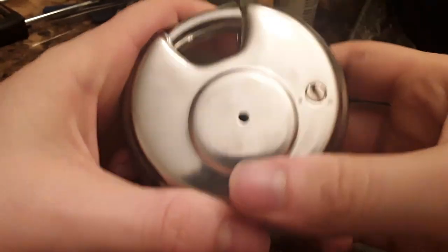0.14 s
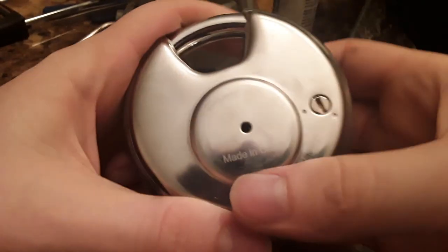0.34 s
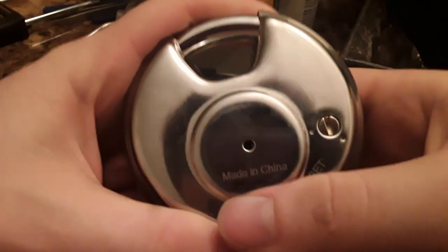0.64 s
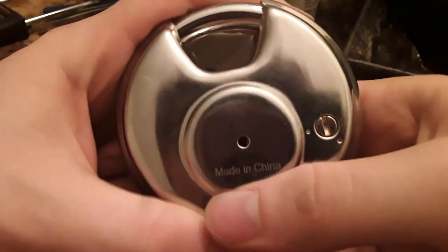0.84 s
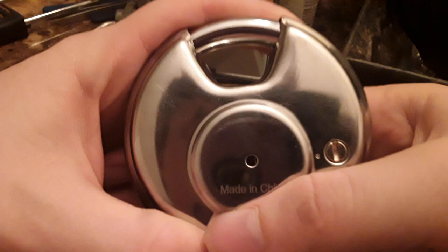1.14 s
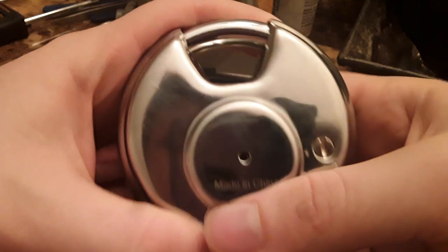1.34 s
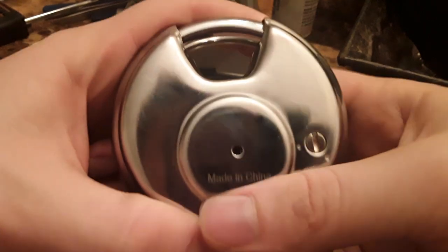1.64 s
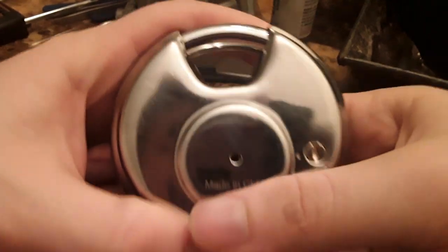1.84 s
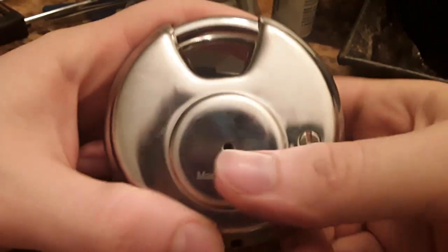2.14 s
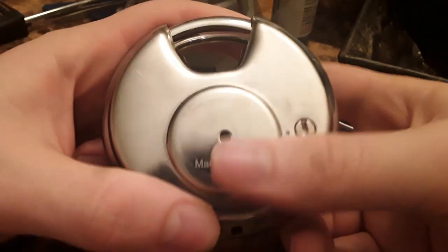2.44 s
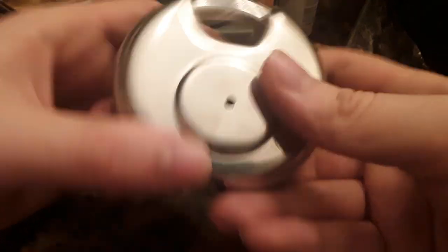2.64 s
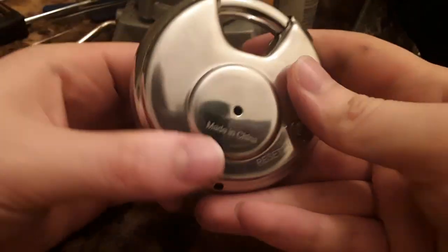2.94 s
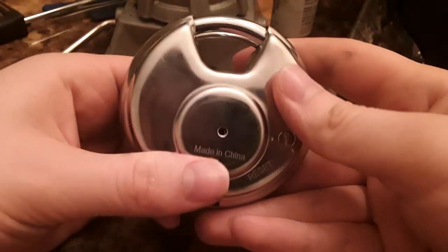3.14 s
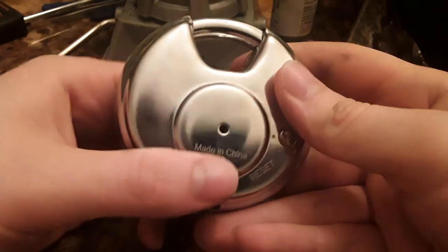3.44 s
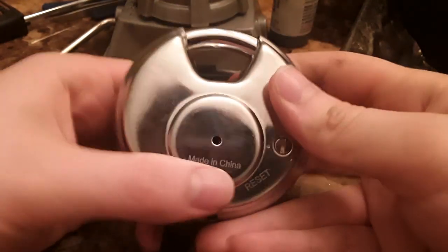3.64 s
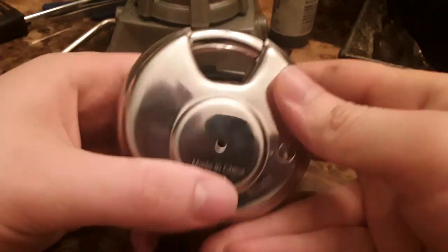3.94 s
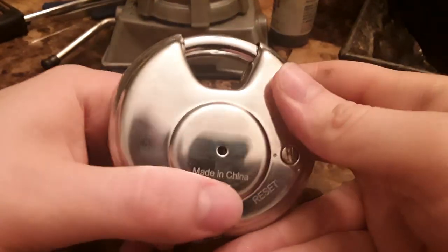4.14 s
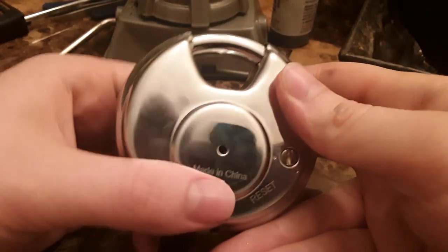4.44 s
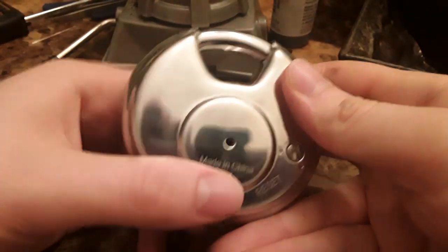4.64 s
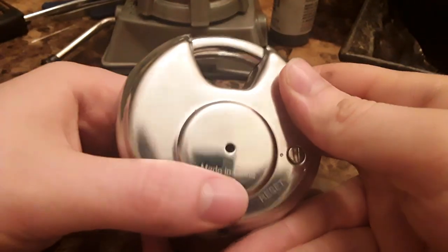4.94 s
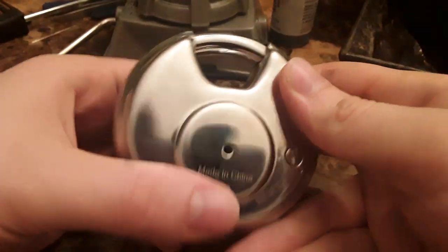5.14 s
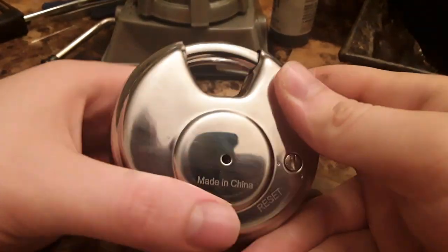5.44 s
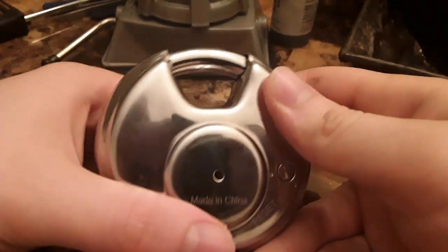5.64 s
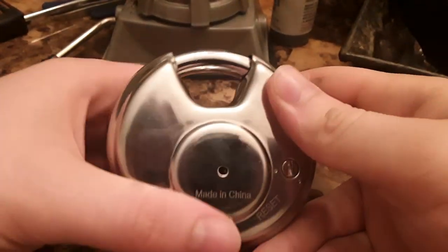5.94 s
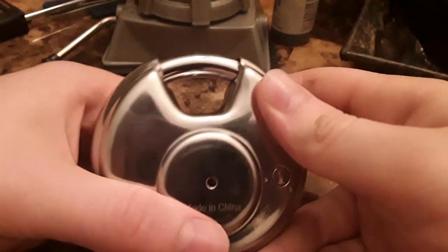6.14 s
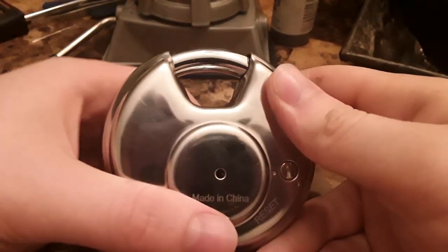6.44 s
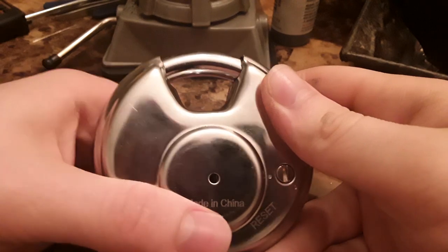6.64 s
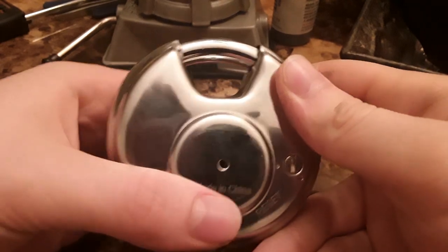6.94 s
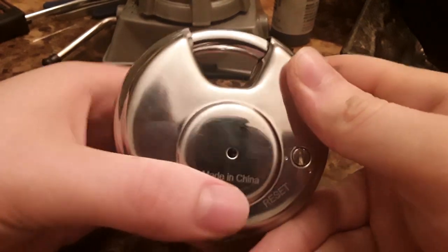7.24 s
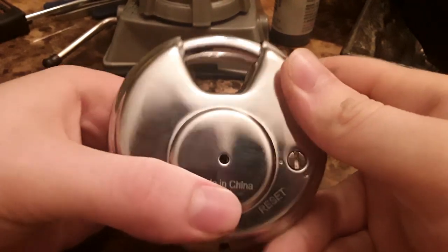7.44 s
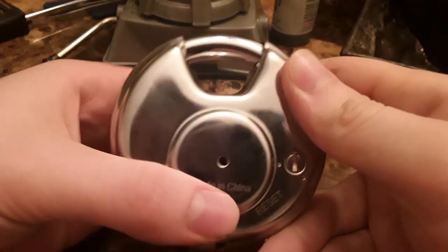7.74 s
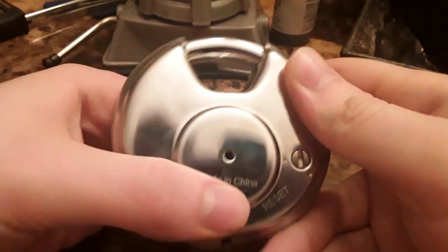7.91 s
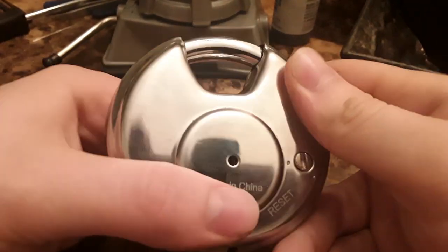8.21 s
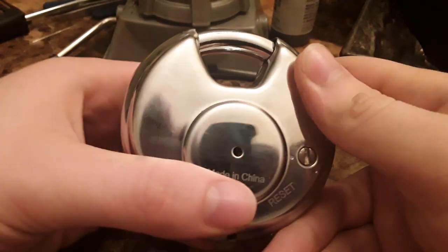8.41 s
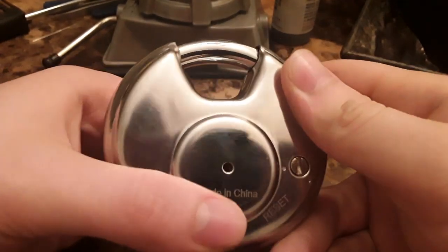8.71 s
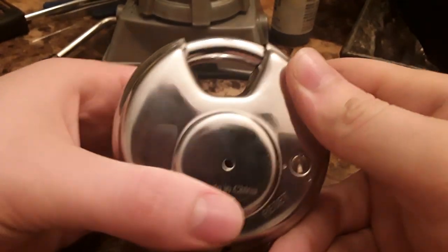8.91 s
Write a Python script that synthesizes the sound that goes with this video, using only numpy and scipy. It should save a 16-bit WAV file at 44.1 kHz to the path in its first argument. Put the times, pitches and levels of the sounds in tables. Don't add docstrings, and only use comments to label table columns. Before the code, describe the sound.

A steel combination lock is worked by thumb near the microphones. Each notch gives a bright snap, a few milliseconds of loose chatter and a tiny palm thump. Clusters come about two or three a second, pausing around two and a half seconds, then continuing with faint ticks between. Light skin scuffs, soft counter bumps and a short room reflection sit over low hiss.

```python
import sys
import numpy as np
from scipy import signal
from scipy.fft import rfft, irfft
from scipy.io import wavfile
from scipy.ndimage import uniform_filter1d

SR = 44100
rng = np.random.default_rng(int(sys.argv[2]) if len(sys.argv) > 2 else 0)


def dump(signal):
    limited = np.clip(np.atleast_2d(signal).T, -1, 1)
    pcm = np.round(limited * 32767).astype(np.int16)
    wavfile.write(sys.argv[1], SR, pcm)


def natural_amplitude(level_db):
    exponent = np.asarray(level_db, float) / 20
    return 10 ** exponent


N = 399987

# pitch_hz, density_db
AIR_SPECTRUM = [(18, -47), (30, -39), (90, 0), (208, -8.5), (333, -13), (456, -17), (675, -18.5),
                (960, -12), (1150, -16), (3000, -13.5), (7300, -5), (8110, -14), (11100, -9.5), (13000, -13),
            (15600, -21)]
AIR_DB = -60.5
# pitch_hz, correlation [0-1]
AIR_SAME = [(60, 0.5), (400, 0.75), (900, 0.1)]
# pitch_hz, t60_s
ROOM_T60 = [(800, 0.58), (2000, 0.39), (6000, 0.49), (12000, 0.36)]
# start_s, level_db, pitch_hz
FAR_KNOCKS = [
    (.079, -55, 610),
    (.155, -63, 620),
    (.47, -55, 590),
    (.6, -52, 570),
    (.912, -50, 500),
    (2.725, -60, 550),
]
# start_s, level_db, pitch_hz
COUNTER_BUMPS = [
    (2.17, -59, 160),
    (2.7, -61.5, 226),
    (3.093, -61, 318),
    (4.051, -60, 233),
    (4.089, -57.5, 304),
    (4.374, -60.5, 140),
    (6.58, -61, 290),
    (7.32, -63, 290),
]
# time_s, level_db
SKIN_RUB = [(0, -70), (.3, -75.5), (.5, -68), (.75, -70), (.9, -60.5), (1., -55.5), (1.2, -56.5),
            (1.33, -77.5), (1.5, -62), (1.65, -58.5), (1.75, -62), (1.9, -62), (2.05, -68), (2.3, -84.5)]

# pitch_hz, width_hz, level_db
SHELL_MODES = [(973, 230, -6.5), (1288, 146, 5.5), (1850, 190, 3.5)]
# pitch_hz, width_hz, level_db
PLATE_MODES = [(2480, 2400, 0), (3190, 910, 9.5), (4110, 750, 0)]
# pitch_hz, width_hz, level_db
DIAL_MODES = [(4825, 390, 5), (5620, 700, 4.5), (6070, 970, 9.5), (6690, 1850, -8.5)]
# pitch_hz, width_hz, level_db
PIN_MODES = [(7730, 1300, -6.5), (9520, 460, -2), (10900, 540, -5.5), (12270, 330, 4), (14800, 1300, -6.5)]
PARTS = (SHELL_MODES, PLATE_MODES, DIAL_MODES, PIN_MODES)
PART_APART = [0.14, 0.5, 0.6, 0.9]

# start_s,
# end_s, start_db, end_db, shell_above_mix_db
LOOSE_DRAGS = [(0.067, 0.085, -39.0, -28.5, -1.5), (0.339, 0.354, -22.5, -31.0, 1.0),
               (0.487, 0.522, -39.0, -31.0, -2.0), (0.741, 0.757, -28.0, -25.5, 0.5),
               (1.077, 1.128, -31.5, -35.5, -1.5), (1.395, 1.434, -34.5, -28.5, -0.5),
               (1.77, 1.785, -42.5, -28.0, 0.5), (2.165, 2.218, -47.5, -48.0, -1.5),
               (3.276, 3.295, -24.0, -29.5, -7.0), (3.659, 3.729, -32.5, -36.0, -4.0),
               (4.085, 4.101, -32.0, -21.5, -1.0), (4.467, 4.485, -27.0, -33.0, 0.0),
               (4.811, 4.861, -39.0, -26.5, -1.0), (5.178, 5.229, -44.0, -38.0, 0.5),
               (6.162, 6.212, -45.0, -41.0, 0.0), (6.567, 6.607, -33.0, -28.0, 2.5),
               (6.993, 7.008, -37.5, -26.5, -3.0), (7.398, 7.422, -29.5, -29.0, -1.0),
               (7.785, 7.81, -35.5, -20.5, 1.5), (8.139, 8.184, -29.0, -31.5, -2.5),
               (8.541, 8.612, -42.0, -35.5, -1.0), (9.001, 9.036, -38.0, -36.0, -0.5),
               (7.009, 7.036, -30.0, -35.5, -0.5), (4.043, 4.084, -39.5, -37.5, 0.0),
               (7.426, 7.462, -34.0, -47.0, 1.0), (7.758, 7.77, -44.5, -37.5, -1.5),
               (4.783, 4.803, -50.0, -49.5, 3.0), (2.973, 2.984, -52.5, -54.5, -2.0),
               (1.722, 1.734, -40.0, -47.5, -0.5), (7.914, 7.925, -50.0, -52.5, 0.5),
               (3.971, 3.982, -54.5, -59.0, 5.0), (3.31, 3.328, -34.5, -43.0, -2.5)]
DRAG_BALANCE = [0, -2, 1.5, -3]

# start_s, dial_db, shell_above_dial_db, pin_above_dial_db
NOTCH_DROPS = [(0.3428, -30.0, 2.5, -22.0), (0.7294, -26.5, -5.0, -9.0), (0.7352, -26.0, -6.0, -6.0),
               (0.789, -26.5, -15.5, -12.5), (1.0905, -28.5, -4.5, -9.5), (1.403, -29.0, -4.0, -12.0),
               (1.7679, -30.0, -2.5, -3.5), (1.7746, -25.0, -10.5, 2.5), (2.8353, -38.5, 11.5, 0.0),
               (3.2769, -32.0, -7.5, -1.0), (3.3032, -23.0, -8.0, -7.0), (3.6846, -25.5, -12.0, -1.0),
               (4.0962, -29.0, -14.5, -1.0), (4.1155, -25.5, -4.5, -12.0), (4.293, -32.5, 5.5, -5.0),
               (4.3059, -25.0, -15.5, -13.5), (4.4746, -34.0, -4.5, 7.0), (4.4852, -32.0, 1.5, 6.5),
               (4.8372, -31.0, -0.5, -2.0), (4.8455, -29.0, -2.5, -3.5), (4.9863, -23.5, -9.0, -22.0),
               (6.3349, -31.0, -5.5, -6.5), (7.006, -29.5, -1.0, 1.5), (7.3207, -31.5, -8.5, 1.0),
               (7.4221, -29.0, 0.5, 2.0), (7.8075, -30.0, -5.0, 2.5), (8.1187, -33.5, 8.0, -2.0),
               (8.156, -20.5, -20.5, -4.0), (8.2657, -29.5, -1.0, -10.0), (8.747, -30.0, -4.0, -11.5)]
# plate_above_share_db, upper_shell_mode_db, upper_dial_modes_db
SEATS = [(-1.5, -1.0, 1.0), (1.5, 1.5, 4.0), (-1.0, 2.0, 0.5), (-0.5, 2.0, -8.0), (-1.0, 5.5, 5.0),
         (-0.5, 9.5, 5.0), (-0.5, 5.5, -3.5), (0.0, -2.0, 2.0), (5.0, 3.5, 3.5), (2.0, -9.5, 5.5),
         (3.0, 0.5, -4.0), (-3.0, -5.0, 3.0), (7.0, -1.5, 3.0), (1.0, 3.0, -1.0), (-3.0, -1.0, -6.0),
         (0.0, -1.0, -7.5), (3.0, -1.0, -4.0), (4.0, 0.5, 4.0), (-1.0, 1.0, 1.5), (-4.0, -0.5, 5.0),
         (0.5, 6.5, 2.5), (2.5, -4.5, 8.0), (-2.5, -1.5, -1.5), (-2.0, -1.5, 4.5), (-1.5, -2.0, -2.5),
         (1.5, 3.5, 0.0), (-5.0, -3.5, 0.5), (-1.0, -7.0, 3.0), (3.5, 7.0, 0.0), (7.5, 1.5, 2.5)]
# start_s, dial_db, shell_above_dial_db, plate_above_share_db, upper_shell_mode_db
WHEEL_CLACKS = [(0.9948, -41.0, 14.0, 1.0, 0.0), (1.1094, -35.5, 1.0, 0.0, 2.0),
                (1.4268, -31.5, 0.0, -6.5, 3.5), (3.0622, -44.0, 8.5, 2.0, 9.5),
                (3.4501, -44.0, 6.5, 1.0, -2.0), (3.493, -39.0, 8.0, 4.0, -4.0),
                (3.5011, -42.0, 8.0, 2.5, -2.0), (3.5868, -55.0, 21.0, 4.0, 0.5),
                (3.669, -41.5, 0.5, 5.0, 2.5), (3.692, -46.5, -4.5, -0.5, -9.5),
                (3.8612, -40.0, 0.5, 1.5, 4.5), (4.06, -32.0, 0.0, -4.0, -6.5),
                (4.2717, -39.5, 8.0, 3.0, -6.0), (5.6002, -49.5, 14.0, -1.5, -6.5),
                (5.6058, -48.0, 7.0, 1.0, -1.0), (5.8497, -40.5, 2.5, 4.5, -6.0),
                (6.0647, -38.5, 5.0, -4.5, -7.5), (6.103, -58.5, 23.5, -1.5, -5.0),
                (6.573, -47.5, 15.0, -4.5, -6.0), (6.5802, -39.0, 5.0, -2.5, -2.5),
                (6.5998, -44.0, 11.5, -6.5, -9.0), (6.6503, -48.5, 11.0, 1.0, -1.5),
                (6.7363, -33.5, 1.0, 1.5, -1.5), (7.0262, -39.0, 1.0, -5.5, -3.5),
                (7.435, -41.0, 1.5, -1.5, -3.0), (8.1672, -39.0, 1.5, 2.5, 1.0),
                (8.5513, -40.0, 5.0, -1.0, -3.0), (8.8747, -35.0, 2.0, -4.0, -7.5),
                (9.0237, -45.0, 8.0, -1.0, -4.0), (9.0326, -49.0, 10.5, -2.0, 1.5)]
# start_s, dial_db, shell_above_dial_db, plate_above_share_db,
# upper_shell_mode_db
TOOTH_CLICKS = [(0.0029, -38.0, -14.5, 0.0, 0.0), (0.0826, -36.5, -5.5, -1.5, 0.0),
                (0.4595, -40.0, -5.5, 6.0, -6.5), (0.513, -33.5, -2.5, -5.5, -8.5),
                (0.5718, -36.0, -10.0, 3.0, -2.0), (0.7228, -34.0, -8.0, 7.5, -3.5),
                (0.7435, -35.0, 0.5, 0.5, 1.0), (1.2436, -39.5, -10.0, 1.0, 2.0),
                (1.3602, -36.0, -12.0, 0.0, 3.0), (1.7858, -33.5, -2.5, -1.0, 11.5),
                (2.1641, -31.0, -18.5, 7.0, 4.0), (2.175, -34.5, -8.0, 1.5, 3.5),
                (2.1984, -40.5, -18.0, 7.0, -2.5), (3.673, -31.0, -11.5, -2.5, 0.5),
                (3.7095, -42.0, -6.5, 1.5, -4.5), (4.0357, -31.5, -13.5, 2.5, -1.5),
                (4.0842, -38.5, -8.0, 4.5, -2.5), (5.0974, -33.5, -8.5, -3.0, 0.0),
                (5.197, -38.0, -3.5, -2.5, -3.0), (5.2161, -35.5, -2.0, -2.0, -4.0),
                (7.0176, -32.0, -5.5, -4.5, -4.0), (7.3327, -36.5, -8.5, -1.0, -1.5),
                (7.4094, -31.0, -8.5, -2.5, 1.0), (7.7004, -38.0, -6.5, 1.5, -4.5),
                (7.851, -36.0, -12.0, 2.0, -7.5), (8.0623, -39.0, -11.5, 2.0, -2.0),
                (8.0768, -40.5, -6.0, -4.0, -11.5), (8.1406, -35.0, -9.0, 2.5, -6.5),
                (8.8937, -33.0, -10.5, 1.5, 4.0), (8.9977, -34.0, -4.0, 0.5, -11.0)]
# start_s, dial_db, shell_above_dial_db, plate_above_share_db,
# upper_shell_mode_db
NEIGHBOUR_CLICKS = [(0.0256, -30.0, -10.5, -1.0, -2.5), (0.1723, -38.5, -3.0, 1.5, 1.0),
                    (0.4987, -35.0, -13.5, 2.0, -6.5), (1.0717, -43.0, -0.5, 0.0, 5.5),
                    (1.5615, -35.0, -4.0, 5.0, 4.5), (1.8511, -34.0, -2.5, 7.0, 3.0),
                    (2.1878, -34.5, -17.0, -1.5, -1.5), (3.102, -34.5, -7.5, 2.0, -7.0),
                    (3.2011, -35.0, -14.0, 1.0, -11.5), (3.2995, -35.0, -14.0, 0.0, 0.0),
                    (3.367, -36.0, -7.5, 6.0, 1.5), (3.574, -41.0, 3.0, 3.5, -8.5),
                    (3.8537, -31.0, -6.0, -2.0, 3.0), (3.9072, -36.0, -4.0, 1.0, 6.5),
                    (4.0488, -40.5, -5.0, 3.0, 1.0), (4.445, -35.0, -7.5, 3.0, -8.0),
                    (4.8291, -40.0, -8.0, 5.0, -0.5), (5.3941, -31.5, -8.5, 3.0, 0.0),
                    (5.4313, -37.5, -7.5, -0.5, 2.0), (6.5638, -46.0, 1.0, -0.5, -2.0),
                    (6.9226, -34.5, -4.0, -1.5, -4.5), (7.1504, -34.5, -5.5, 0.0, -1.0),
                    (7.403, -34.0, -4.0, -4.0, -4.5), (7.5075, -31.5, -2.0, -2.5, 0.0),
                    (8.176, -32.0, -2.5, -6.0, -9.0), (8.2263, -40.0, -2.5, -7.5, 5.5),
                    (8.5637, -34.0, -9.5, 0.5, 1.5), (8.5785, -32.0, -6.0, -0.5, -3.5),
                    (8.5946, -31.0, -16.0, -0.5, 6.0), (9.016, -31.5, -1.5, -3.5, -6.5)]
# start_s, dial_db, shell_above_dial_db
SHELL_PLAY = [(0.1164, -53.5, 10), (1.0264, -60, 14), (1.039, -56, 15), (1.3686, -62, 20.5),
              (1.8654, -58, -6.5), (3.093, -52, 10.5), (3.2558, -54, 13), (3.4743, -52, 10),
              (3.5955, -47.5, -3), (3.7236, -47, 4), (4.2636, -51.5, 4.5), (4.5639, -50.5, 11),
              (4.594, -50, 6.5), (4.821, -49, 5), (5.1364, -57, 11), (5.1525, -47, 3), (5.536, -55.5, 16.5),
              (5.5601, -46.5, 8), (6.0427, -64.5, 21), (6.054, -51, 5), (6.16, -54, 9),
              (6.1696, -48.5, 4.5), (6.2282, -49.5, 6.5), (6.658, -45, -2), (7.3705, -51, 4),
              (7.383, -50, 5), (7.5302, -60, 16), (7.868, -49, 7.5), (8.2017, -59, 4), (8.6073, -60, 11)]
# start_s, dial_db, shell_above_dial_db
DIAL_PLAY = [(0.059, -44, 1), (0.3157, -49, 4), (0.5652, -47, 0), (0.6792, -47, 0), (0.6931, -46.5, 4),
             (1.348, -42, 0), (1.6755, -44, -1.5), (1.7411, -40.5, -0.5), (2.7832, -48, 4),
             (3.1353, -48.5, 2.5), (3.267, -45, -5), (3.43, -42.5, 0), (3.744, -46.5, 0.5),
             (4.3823, -40.5, -13), (4.756, -41, -13), (4.8822, -45, -6), (5.172, -45.5, 2),
             (5.4154, -41.5, -3.5), (5.9977, -44, -1.5), (6.1213, -40.5, -8), (6.1904, -43.5, -7),
             (6.3502, -43.5, 0), (7.0874, -41, -1), (7.349, -40, -20), (7.4724, -41, -15),
             (7.7093, -43, -18), (7.757, -42.5, -4), (8.1104, -45, -1), (8.1315, -42, -6),
             (8.3258, -42, -14)]
PIN_LEVELS = [-9, -1.5, -12, -11, -6]
# start_s, dial_db
FINGER_CREAKS = [(0.4463, -48), (1.218, -50), (1.6829, -62), (2.1027, -53.5), (2.1403, -51.5),
                 (2.1546, -51), (2.3423, -56), (2.3654, -57), (2.7185, -54), (3.9974, -53), (4.4164, -50),
                 (4.434, -51), (5.377, -55), (5.5288, -53), (6.5061, -52.5), (6.7693, -50.5), (6.945, -50),
                 (7.488, -53), (8.459, -53.5), (8.5316, -49.5), (8.7607, -61)]


def evened(x):
    return x / np.sqrt(np.mean(x ** 2, -1, keepdims=True) + 1e-20)


def read(points, hz):
    f, value = np.transpose(points)
    return np.interp(np.log(hz + 1), np.log(f + 1), value)


def add(mix, s, sound):
    part = mix[:, round(s * SR):][:, :sound.shape[1]]
    part += sound[:, :part.shape[1]]


def pair(shape, apart):
    noise = rng.standard_normal(shape[:-1] + (3, shape[-1]))
    apart = np.clip(apart, 0, 1)
    return np.sqrt(1 - apart) * noise[..., :1, :] + np.sqrt(apart) * noise[..., 1:, :]


def ringing(modes, detune, spread_db, size):
    hz = np.fft.rfftfreq(size, 1 / SR)
    out = 0
    for k, (f, width, db) in enumerate(modes):
        f0 = f * (1 + detune[..., k, None])
        strength = (-1) ** k * natural_amplitude(db + spread_db[..., k, None])
        out = out + strength * 1j * hz * width / (f0 ** 2 - hz ** 2 + 1j * hz * width)
    low = 1j * hz / (0.67 * modes[0][0])
    high = 1j * hz / (1.7 * modes[-1][0])
    return out * (low ** 2 / (1 + low + low ** 2)) ** 2 / (1 + high + high ** 2)


def air():
    frames, hz = N // 256 + 5, np.fft.rfftfreq(1024, 1 / SR)
    a, b, c, d, patches = rng.standard_normal((frames, 513, 5)).T
    patches = evened(uniform_filter1d(uniform_filter1d(patches, 12, 0), 14, 1))
    same = np.clip(read(AIR_SAME, hz), -1, 1)[:, None]
    left = a + 1j * b
    right = same * left + np.sqrt(1 - same ** 2) * (c + 1j * d)
    colour = natural_amplitude(read(AIR_SPECTRUM, hz)[:, None] + 1.22 * patches)
    hiss = signal.istft(np.array([left, right]) * colour, nperseg=1024, noverlap=768)[1]
    return natural_amplitude(AIR_DB) * evened(hiss[:, :N])


def room(x):
    taps = np.zeros((2, SR // 2))
    grid = np.arange(260, SR // 2 - 20, 20)
    at = grid + rng.integers(0, 20, (2, (SR // 2 - 261) // 20))
    np.put_along_axis(taps, at, rng.choice([-1., 1.], at.shape), 1)
    hz, t, z = signal.stft(taps, SR, nperseg=256)
    decay = natural_amplitude(-60 * t / read(ROOM_T60, hz)[:, None])
    tail = signal.istft(z * decay, SR, nperseg=256)[1]
    return signal.fftconvolve(x.mean(0)[None], tail / np.linalg.norm(tail[0]), axes=1)[:, :N]


def thuds(rows, width, t60, apart):
    out, t = np.zeros((2, N)), np.arange(4096) / SR
    rise = 1 - np.exp(-t / .008)
    for s, db, hz in rows:
        colour = ringing([(hz, width * hz, 0)], np.zeros(1), np.zeros(1), 4096)
        puff = evened(irfft(rfft(pair((4096,), apart)) * colour ** 2))
        add(out, s - .004, puff * natural_amplitude(db - 60 * t / t60) * rise)
    return out


def palm():
    below_dial_db, pitch_hz = -35.5, 267
    rows = [(s, dial + below_dial_db, pitch_hz) for s, dial, *_ in NOTCH_DROPS]
    return thuds(rows, 1, 0.09, 0.11)


def rub():
    lumps = evened(uniform_filter1d(uniform_filter1d(rng.standard_normal(N), 500), 500))
    level = natural_amplitude(np.interp(np.arange(N) / SR, *np.transpose(SKIN_RUB)) + 3.2 * lumps)
    out = 0
    for low_hz, high_hz, db in [(183, 477, -2.0), (60, 120, -14.0), (1250, 3200, 5.5)]:
        band = signal.butter(2, [low_hz, high_hz], "bandpass", fs=SR, output="sos")
        out = out + natural_amplitude(db) * evened(signal.sosfilt(band, pair((N,), 0.2)))
    return level * out


def drags():
    out, size = np.zeros((2, N)), 4096
    t = np.arange(size) / SR
    for start, end, db0, db1, shell_db in LOOSE_DRAGS:
        bumps = uniform_filter1d(uniform_filter1d(rng.standard_normal(size), 24), 24)
        span = np.clip(np.minimum(t, end - start - t) / .003, 0, 1)
        grain_db = 4.6 * evened(bumps) - 8.5
        push = span * natural_amplitude(grain_db + np.interp(t, [0, end - start], [db0, db1]))
        luck = rng.standard_normal((4, 10)) * np.repeat([.015, 2], 5)
        levels = np.add(DRAG_BALANCE, [shell_db, 0, 0, 0])
        for modes, v, db, apart in zip(PARTS, luck, levels, PART_APART):
            part = ringing(modes, v[:5], v[5:], size)
            part = part / np.sqrt(np.mean(abs(part) ** 2))
            add(out, start, irfft(rfft(pair((size,), apart) * push) * natural_amplitude(db) * part))
    return out


def strikes():
    plate_share, plate_db = 0.48, -2
    creak_shell_db, creak_pin_db = -1.7, -10
    tables = (WHEEL_CLACKS, TOOTH_CLICKS, NEIGHBOUR_CLICKS, SHELL_PLAY, DIAL_PLAY)
    rows = [(*row, *seat) for row, seat in zip(NOTCH_DROPS, SEATS)]
    for table, pin in zip(tables, PIN_LEVELS):
        rows += [(*row[:3], pin, *row[3:]) for row in table]
    rows += [(*row, creak_shell_db, creak_pin_db) for row in FINGER_CREAKS]
    filled = [[*row, 0, 0, 0][:7] for row in rows]
    s, dial, shell, pin, plate, grip, lean = np.transpose(filled)
    plate_level = dial + plate_share * shell + plate_db + plate
    return np.transpose([s, dial + shell, plate_level, dial, dial + pin, grip, lean])


def snaps():
    rows, size = strikes(), 1024
    t = np.arange(size) / SR
    luck = rng.standard_normal((len(rows), 4, 11))
    detune, spread_db = .025 * luck[..., :5], 3.5 * luck[..., 5:10]
    spread_db[:, 0, :3] += (1 + rows[:, 5:6]) * np.array([0, -1, 1])
    spread_db[:, 2, :4] += rows[:, 6:] * np.array([-1, 0, 1, 1])
    chatter_s = 0.0033 * np.exp(0.21 * luck[:, 0, 10, None])
    rise_s = .0005 * np.exp(.5 * luck[:, 1, 10, None])
    dying = np.exp(-t / chatter_s) + 1.34 * np.exp(-t / 0.00039)
    contact = (1 - np.exp(-t / rise_s)) * dying / (1 + (t / 0.01) ** 4)
    sound = spread = 0
    for k, modes in enumerate(PARTS):
        level_db = rows[:, k + 1, None, None]
        force = rfft(pair((len(rows), size), PART_APART[k]) * contact[:, None])
        ring = irfft(force * ringing(modes, detune[:, k], spread_db[:, k], size)[:, None])
        sound = sound + natural_amplitude(level_db - 3.0) * evened(ring)
        wide = [(f, 4 * width, db) for f, width, db in modes]
        blur = irfft(ringing(wide, detune[:, k], spread_db[:, k], size))
        spread = spread + natural_amplitude(level_db - 9.5) * evened(blur)[:, None]
    out = np.zeros((3, N))
    for s, one in zip(rows[:, 0], np.concatenate([sound, spread], axis=1)):
        add(out, s, one)
    return out[:2], out[2:]


def scene():
    (snap, spread), drag = snaps(), drags()
    lock, lean_db = snap + drag + rub(), np.linspace(.3, 1.1, N)
    late = np.roll(lock[1], 8)
    near = np.array([natural_amplitude(lean_db) * lock[0], natural_amplitude(-lean_db) * late])
    sent = natural_amplitude(-12.0) * spread + natural_amplitude(-17.5) * (snap + drag)
    turn = 2 * np.pi * np.arange(N) / SR
    far = room(sent * np.cos(turn)) + room(sent * np.sin(turn))
    knocks = thuds(FAR_KNOCKS, 0.3, 0.25, 0.48)
    bumps = thuds(COUNTER_BUMPS, 1.0, 0.22, 0.13)
    return natural_amplitude(-3.5) * near + far + knocks + bumps + palm() + air()


def top_cut(x):
    return signal.sosfilt(signal.butter(12, 16810, fs=SR, output="sos"), x)


def record(dry):
    bass_cut = signal.sosfilt(signal.butter(1, 45, "highpass", fs=SR, output="sos"), dry)
    edge = signal.firwin2(511, [0, 15650, 15950, 16600, 16800, SR / 2], [1, 1, .06, .03, 0, 0], fs=SR)
    mix = signal.oaconvolve(bass_cut, edge[None], "same")
    return top_cut(mix)


dry = scene()
out = record(dry)
dump(out)
```